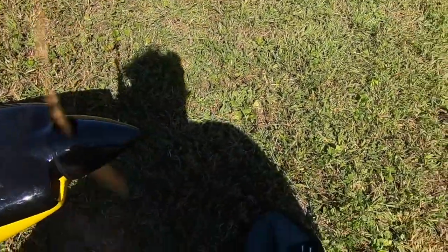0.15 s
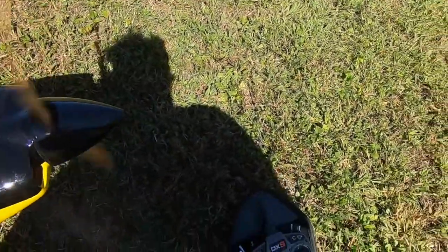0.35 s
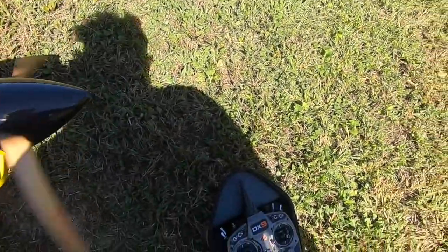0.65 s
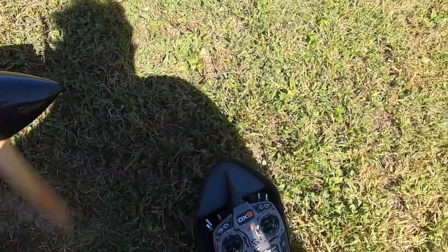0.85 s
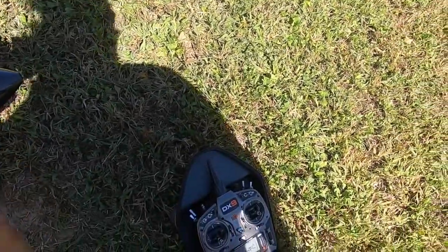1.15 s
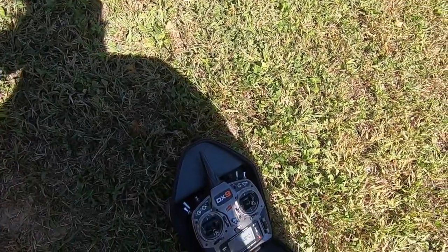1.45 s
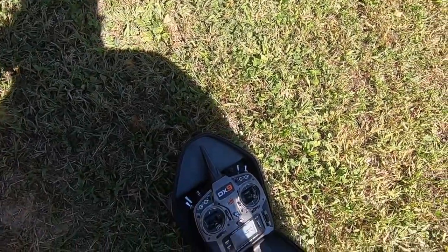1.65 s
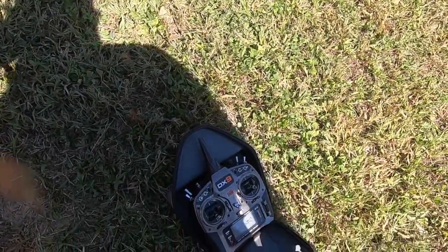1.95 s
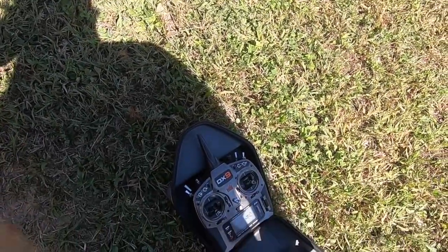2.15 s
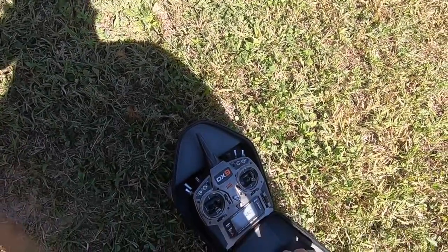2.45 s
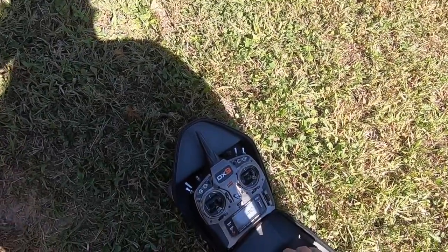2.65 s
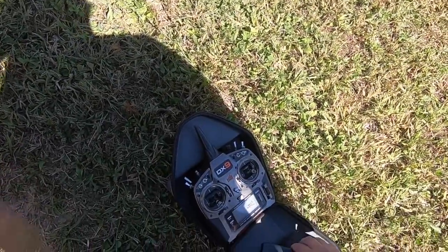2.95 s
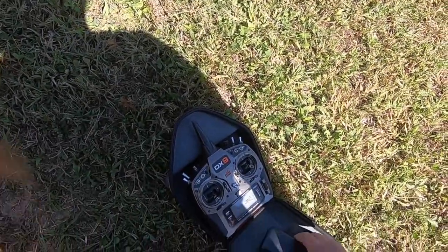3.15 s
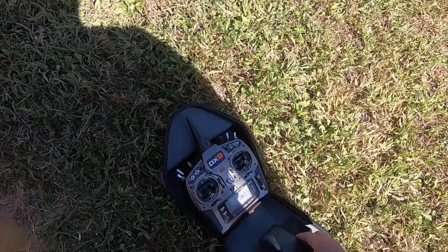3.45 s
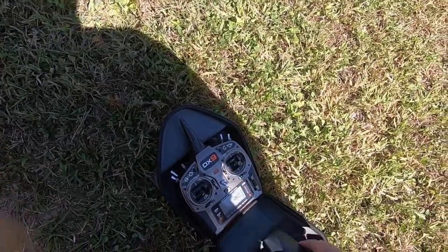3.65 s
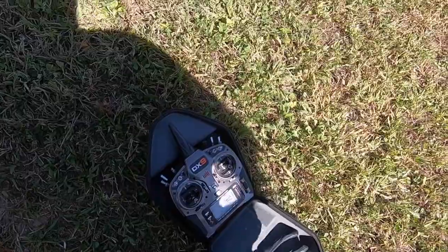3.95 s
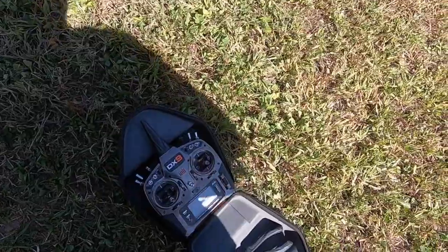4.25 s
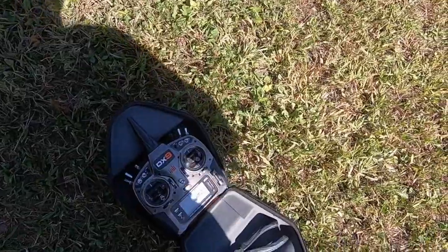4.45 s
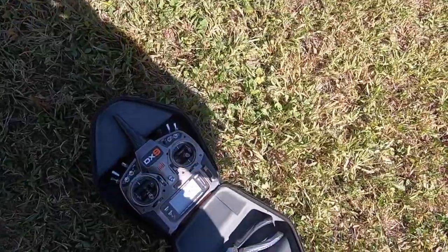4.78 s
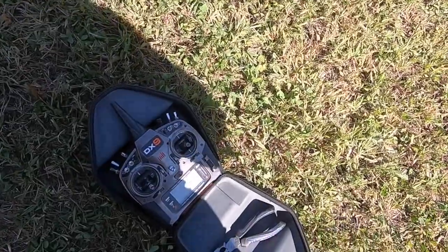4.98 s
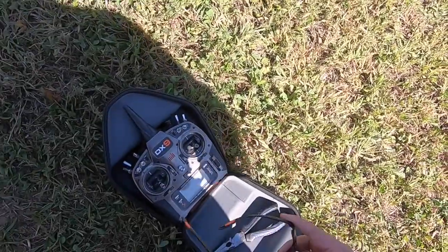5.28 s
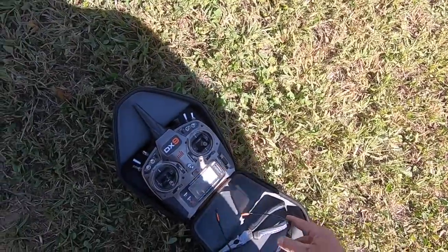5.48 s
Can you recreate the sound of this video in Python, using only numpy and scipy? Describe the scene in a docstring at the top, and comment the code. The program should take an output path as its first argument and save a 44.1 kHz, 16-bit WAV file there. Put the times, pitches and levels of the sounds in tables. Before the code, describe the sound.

A single-cylinder two-stroke on a large model plane idles throughout, close and loud, in the open over grass. The shaft turns about fifty times a second, each turn giving a soft low muffler puff and a tiny intake hiss, blending into a buzzing flutter. Mostly on every third turn it fires: a hard thump, hollow bark, metallic ring and gritty crack. The rhythm is lumpy, with short gaps near 0.3 s and 0.9 to 1.2 s, quicker pairs around 3.2 s, and slower, sparser, harder pops around 4.2 to 4.5 s before even firing resumes from 5 s. Propeller hum swells briefly around 2.2 and 2.5 s, and airy wash runs underneath. Until 3 s the image is almost mono, from the front, with cowl air fading. From 3.0 to 3.6 s it opens to stereo; as the microphone comes round to the side, pings sharpen, hum weakens after 4 s, and faint wind buffeting appears.

```python
"""On grass, a model plane's single-cylinder two-stroke idles at about 51 turns a second, firing in spells,
mostly on every third turn. Every turn puffs through the muffler's damped modes and sucks a hiss through the intake.
A firing adds a modal thump, bark, fins and ping and a burst of noise, the crack, and kicks the shaft on.
The two-blade propeller hums and churns; shaped noise makes its wash, the muffler's roar and the air round the cowl.
The microphone moves from the plane's front to its side, changing levels, colour, echoes and stereo image."""
import sys
import numpy as np
from scipy.fft import rfft, irfft, next_fast_len
from scipy.io import wavfile
from scipy.ndimage import map_coordinates

SR = 44100
rng = np.random.default_rng(int(sys.argv[2]) if len(sys.argv) > 2 else 0)


def store_wav(level_fs):
    """Save 16-bit WAV to argv[1]."""
    pcm = np.round(np.clip(np.atleast_2d(level_fs), -1, 1) * 32767)
    wavfile.write(sys.argv[1], SR, pcm.T.astype(np.int16))


N = 247842
TURN_HZ = 51.5  # nominal shaft speed
# "position" throughout: microphone 0 in front of the plane, 1 aside


def amp(db):
    """Decibels to gain."""
    return 10 ** (np.asarray(db) / 20)


def unit(x):
    """Scale to rms 1."""
    return x / np.sqrt(np.mean(x ** 2) + 1e-20)


def along(points, hz):
    """Interpolate (frequency [Hz], value) points on a log-frequency axis."""
    f, v = np.transpose(points)
    return np.interp(np.log(hz + 1), np.log(f + 1), v)


def curves(rows):
    """One value per sample for each column after the time."""
    time_s, *cols = np.transpose(rows)
    return [np.interp(np.arange(N) / SR, time_s, c) for c in cols]


def filtered(x, response):
    """Multiply the spectrum of x by a response of frequency."""
    size = next_fast_len(N + SR // 4)
    hz = np.fft.rfftfreq(size, 1 / SR)
    return irfft(rfft(x, size) * response(hz), size)[..., :N]


def noise(spectrum):
    """Stereo noise of rms 1, nearly mono in the bass and wide in the treble."""
    # left-right likeness: (frequency [Hz], correlation [-1 to 1])
    alike = [(100, 0.99), (300, .998), (600, 0.89), (1200, 0.54), (2500, 0.49), (4500, 0.55), (8000, 0.16),
             (13000, 0.2)]

    def mid_side(hz):
        turn_rad = np.arccos(np.clip(along(alike, hz), -1, 1)) / 2
        return amp(along(spectrum, hz)) * [np.cos(turn_rad), np.sin(turn_rad)]

    mid, side = filtered(rng.standard_normal((2, N)), mid_side)
    return unit(np.array([mid + side, mid - side]))


def viewed(front, aside, position):
    """Noise whose colour changes as the microphone moves round the plane."""
    share = np.clip(position, 0, 1)
    return np.sqrt(1 - share) * noise(front) + np.sqrt(share) * noise(aside)


def place(times_s, shapes):
    """Sum one row of samples starting at each time."""
    start = np.round(times_s * SR).astype(int)
    index = start[:, None] + np.arange(shapes.shape[1])
    inside = (index >= 0) & (index < N)
    return np.bincount(index[inside], shapes[inside], N)


def swell(attack_s, t60_s):
    """A quick rise and an exponential decay."""
    t = np.arange(SR // 12) / SR
    return (1 - np.exp(-t / attack_s)) * amp(-60 * t / t60_s)


def ring(hz, t60_s, attack_s, detune):
    """A damped mode, one row for each fractional detuning."""
    t = np.arange(SR // 12) / SR
    return np.sin(2 * np.pi * hz * (1 + detune) * t) * swell(attack_s, t60_s)


def shaft(fired_s, coast_s=.00008):
    """The time of every turn: fast just after a firing, slowing until the next."""
    turns_s = [fired_s[:1] - 1 / TURN_HZ]
    for start, end in zip(fired_s, fired_s[1:]):
        count = max(1, round((end - start) * TURN_HZ))
        k = np.arange(count)
        even = start + (end - start) * k / count
        turns_s.append(even - coast_s * k * (count - k))
    run_out = fired_s[-1] + np.arange(4) / TURN_HZ
    return np.concatenate(turns_s + [run_out])


def firings():
    """The engine skips turns while fresh charge gathers; the longer the wait, the harder it fires."""
    # spells of even firing: (first firing [s], last firing [s], interval [turns], strength before wait gain [dB])
    spells = [(0.0114, 0.2554, 3, -0.5), (0.337, 0.8675, 3, 0.3), (.8883, 0.9475, 3, 1),
              (1.0255, 1.0834, 3, 0), (1.1236, 1.2012, 2, -3), (1.241, 1.3553, 3, -1),
              (1.375, 1.4536, 2, -1), (1.4739, 1.7618, 3, -1), (1.8012, 1.92, 3, 0), (1.9406, 2.1741, 3, 0),
              (2.2507, 2.3074, 3, -0.5), (2.3868, 2.4458, 3, 0.5), (2.485, 2.5422, 3, -1),
              (2.5792, 2.6368, 3, -0.5), (2.6949, 2.875, 3, -1.5), (2.9149, 3.1443, 3, -1),
              (3.1802, 3.2562, 2, -1.5), (3.2744, 3.3516, 2, -2), (3.4068, 3.4647, 3, -2),
              (3.4834, 4.0001, 3, 0), (4.0795, 4.137, 3, 1), (4.2147, 4.292, 4, 0.5),
              (4.3492, 4.4477, 5, 1), (4.5059, 4.5643, 3, 0), (4.6028, 4.6415, 2, 0.5),
              (4.701, 4.9339, 3, 0.5), (5.0125, 5.5996, 3, 0)]
    # times near turns on which part of the charge burns weakly and early [s]
    early_near_s = [1.182, 1.5122, 2.5986, 2.9342, 3.3318, 3.7519, 3.9804, 4.5447, 5.1687, 5.4042]
    usual_wait_turns, gain_db_per_doubled_wait, early_strength_db = 3, 2.5, -6.5
    fired_s, spell_db = [], []
    for first, last, every, db in spells:
        count = round((last - first) * TURN_HZ / round(every)) + 1
        fired_s.append(np.linspace(first, last, count))
        spell_db.append(np.full(count, db))
    fired_s = np.concatenate(fired_s)
    before_s = fired_s[0] - usual_wait_turns / TURN_HZ
    wait_turns = np.diff(fired_s, prepend=before_s) * TURN_HZ
    wait_gain_db = gain_db_per_doubled_wait * np.log2(wait_turns / usual_wait_turns)
    strength_db = np.concatenate(spell_db) + wait_gain_db
    turns_s = shaft(fired_s)
    nearest = np.abs(turns_s[:, None] - early_near_s).argmin(axis=0)
    early_s = turns_s[nearest]
    early_db = np.full(len(early_s), early_strength_db)
    return turns_s, np.append(fired_s, early_s), np.append(strength_db, early_db)


def excited(law, strength_db, position, scatter_db):
    """The level of one part's answer to each firing, from the microphone's position and the firing's strength."""
    *view_db, slope = law
    scatter = scatter_db * rng.standard_normal(len(position))
    return np.interp(position, [0, .5, 1], view_db) + slope * strength_db + scatter


def muffler(times_s, db, modes, attack_s, scatter_db, drift):
    """Gas pulses ring the muffler; a hotter pulse is a little louder and higher."""
    heat = rng.standard_normal((len(times_s), 1))
    rings = sum(strength * ring(hz, t60_s, attack_s, drift * heat) for hz, strength, t60_s in modes)
    return place(times_s, amp(db[:, None] + scatter_db * heat) * rings)


def puffs(turns_s, puff_db):
    """An unburnt charge sweeps the muffler and intake on every turn."""
    # (mode [Hz], signed relative strength, t60 [s])
    puff_modes = [(133.3, -0.15, 0.11), (243.3, 0.96, 0.026), (316.6, -1.128, 0.03116),
                  (327.55, 0.753, 0.058), (457.5, 0.019, 0.079), (663, 0.0285, 0.03)]
    db = np.interp(turns_s, np.arange(N) / SR, puff_db)
    return muffler(turns_s + 0.002128, db, puff_modes, attack_s=0.00093, scatter_db=1.0, drift=0.0082)


def thumps(fired_s, strength_db, position):
    """Burnt gas strikes the muffler at each firing."""
    # (mode [Hz], signed relative strength, t60 [s])
    thump_modes = [(111, -0.37, 0.033), (237.8, 0.95, 0.032), (294.2, -0.35, 0.066), (361.6, -0.5, 0.037),
                   (554, 0.023, 0.039), (755, -0.098, 0.016)]
    # (in front [dB], halfway round [dB], aside [dB], slope [dB per dB of strength])
    thump_law = (1.94, 1.14, 0.22, 0.18)
    db = excited(thump_law, strength_db, position, scatter_db=0.28)
    return muffler(fired_s + 0.00027, db, thump_modes, attack_s=0.0006, scatter_db=0.62, drift=0.0063)


def metal(times_s, db, position, modes, attack_s, scatter_db, drift, spread_db):
    """Each firing rings metal modes at new strengths, a little differently to each side."""
    out = np.zeros((2, N))
    for k, (hz, front_db, aside_db, t60_s) in enumerate(modes):
        chance = rng.standard_normal((len(times_s), 3))
        view_db = front_db + position * (aside_db - front_db)
        level_db = db + view_db + scatter_db * chance[:, 0]
        sign = (-1) ** (k + 1)  # neighbouring modes swing oppositely
        rings = sign * ring(hz, t60_s, attack_s, drift * chance[:, 1:2])
        for channel, side in enumerate((1, -1)):
            gain = amp(level_db + side * spread_db * chance[:, 2])
            out[channel] += place(times_s, gain[:, None] * rings)
    return out


def bark(fired_s, strength_db, position):
    """The muffler's shell rings at each firing."""
    # (mode [Hz], relative level in front [dB], relative level aside [dB], t60 [s])
    shell_modes = [(650, -23, -54, 0.052), (994, -24, -31, 0.011), (1420, -11.5, -22, 0.014),
                   (1635, -17, -15, 0.02), (1860, -55, -20.5, 0.024)]
    # (in front [dB], halfway round [dB], aside [dB], slope [dB per dB of strength])
    bark_law = (-1.5, -4.5, -1, 0.84)
    db = excited(bark_law, strength_db, position, scatter_db=0.7)
    return metal(fired_s - .0004, db, position, shell_modes,
                 attack_s=0.00073, scatter_db=1.05, drift=0.023, spread_db=-2.0)


def fins(fired_s, strength_db, position):
    """The cylinder fins ring at each firing."""
    # (mode [Hz], relative level in front [dB], relative level aside [dB], t60 [s])
    fin_modes = [(2510, -35.5, -33, 0.018), (2956, -31, -29.5, 0.021), (4065, -24, -27, 0.017),
                 (4410, -26.5, -22.5, 0.011), (5060, -27, -27, 0.01), (7680, -28.5, -69, 0.012)]
    # (in front [dB], halfway round [dB], aside [dB], slope [dB per dB of strength])
    fin_law = (-1.7, 2, 0, 0.7)
    db = excited(fin_law, strength_db, position, scatter_db=2.45)
    return metal(fired_s + 0.000875, db, position, fin_modes,
                 attack_s=0.00053, scatter_db=0.0, drift=0.029, spread_db=0.5)


def ping(fired_s, strength_db, position):
    """One metal part pings at each firing."""
    # (mode [Hz], relative level in front [dB], relative level aside [dB], t60 [s])
    ping_modes = [(3310, -19, -21, 0.033)]
    # (in front [dB], halfway round [dB], aside [dB], slope [dB per dB of strength])
    ping_law = (-18.5, -21, -2.5, 2)
    db = excited(ping_law, strength_db, position, scatter_db=2.2)
    return metal(fired_s + 0.00099, db, position, ping_modes,
                 attack_s=0.00045, scatter_db=3.4, drift=0.009, spread_db=3.0)


def crack(fired_s, strength_db, fired_position, position):
    """Gas leaks as the port cracks open, bursts out, then hisses on."""
    # noise colours: (frequency [Hz], relative density [dB per Hz])
    crack_front = [(500, 3), (1400, 4), (2100, -2.5), (2700, -0.5), (3500, -10), (4400, -15.5),
                   (5800, -7.5), (7600, -8.5), (8500, -18.5), (10500, -24.5), (11300, -34), (13500, -35),
                   (15800, -40)]
    crack_aside = [(500, 6), (1800, 1), (2400, -3.5), (3000, -0.5), (3700, -19), (4500, -14.5),
                   (6200, -8.5), (8000, -11), (10300, -13.5), (11400, -28.5), (13500, -28), (15800, -34)]
    # (in front [dB], halfway round [dB], aside [dB], slope [dB per dB of strength])
    crack_law = (1.6, 1.1, 2.4, 1.22)
    size = amp(excited(crack_law, strength_db, fired_position, scatter_db=0.87))[:, None]
    leak = amp(-35) * swell(attack_s=0.0015, t60_s=0.048)
    burst = amp(-16.5) * swell(attack_s=0.0004, t60_s=0.005)
    hiss = amp(-26.5) * swell(attack_s=0.0022, t60_s=0.06)
    flow = place(fired_s - .004, size * leak) + place(fired_s + 0.00081, size * (burst + hiss))
    return flow * viewed(crack_front, crack_aside, position)


def propeller(angle_turns, hum_db, churn_db, blade_lead_turns=0.22):
    """Two blades press the air twice a turn and leave a low churning behind."""
    # (frequency [Hz], relative density [dB per Hz])
    churn_spectrum = [(20, -2), (50, 2), (80, -5), (200, 6), (350, -9.5), (530, -5), (600, -9.5),
                      (690, -11), (800, -16), (1300, -55)]
    blades = amp(hum_db + 1.66) * np.cos(4 * np.pi * (angle_turns + blade_lead_turns))
    once_a_turn = amp(-28.5) * np.sin(2 * np.pi * angle_turns)
    return blades + once_a_turn + amp(churn_db - 27.0) * noise(churn_spectrum)


def roar(angle_turns, hum_db, load=1.0, pulse_db=3):
    """Gas swirls through the muffler on every turn, the more so when the propeller pulls hard."""
    # (frequency [Hz], relative density [dB per Hz])
    roar_spectrum = [(300, -24), (450, -7.5), (530, -1), (590, -1.5), (680, 2), (780, -16), (900, -30),
                     (1050, -6.5), (1500, -10.5), (2500, -32), (4000, -43.5)]
    pulse = pulse_db * np.cos(2 * np.pi * (angle_turns - .2))
    return amp(-34.5 + load * (hum_db + 20.5) + pulse) * noise(roar_spectrum)


def intake(turns_s, opens_s=0.0071):
    """The carburettor sucks in a short hiss of varying level about 5 ms after each muffler puff starts."""
    # (frequency [Hz], relative density [dB per Hz])
    intake_spectrum = [(2000, -12), (4500, -2), (7500, 0), (9000, 8), (10500, 3), (11300, -16),
                       (13500, -25), (15800, -35)]
    scatter_db = 3.5 * rng.standard_normal((len(turns_s), 1))
    gulps = amp(-35.0 + scatter_db) * swell(attack_s=0.0014, t60_s=0.012)
    return place(turns_s + opens_s, gulps) * noise(intake_spectrum)


def wash(angle_turns, wash_db, position, chop_db=0.7, throb_db=2.5, gust_db=1.1):
    """Turbulent air hisses off the blades, chopped by each pass and gusting at random."""
    # noise colours: (frequency [Hz], relative density [dB per Hz])
    wash_front = [(400, -11), (680, 3.5), (900, -2.5), (1500, 0.5), (2200, -7), (3500, -11), (4500, -12),
                  (6200, -14.5), (7600, -14.5), (8400, -24), (10500, -29), (11200, -38.5), (13500, -47),
                  (15800, -56)]
    wash_aside = [(400, 2.5), (750, 1), (1100, 0), (1900, 0.5), (2600, -5.5), (4200, -11.5), (5200, -15),
                  (7200, -19.5), (8900, -12), (10400, -29.5), (11300, -30), (13500, -44), (15800, -60)]
    chop = chop_db * np.cos(4 * np.pi * (angle_turns + 0.16))
    throb = throb_db * np.cos(2 * np.pi * (angle_turns + 0.24))
    gusts = gust_db * map_coordinates(rng.standard_normal(400), [angle_turns / 4])
    return amp(wash_db - 31.5 + chop + throb + gusts) * viewed(wash_front, wash_aside, position)


def cowl(angle_turns, start_db=-33.5, fade_db_per_s=11, throb_db=3):
    """Air rushing round the cowl throbs once a turn and fades steadily as the microphone draws back."""
    # (frequency [Hz], relative density [dB per Hz])
    cowl_spectrum = [(400, -27), (700, -8), (930, 4), (1200, -7), (1900, -9.5), (2600, -33), (5000, -50)]
    t = np.arange(N) / SR
    throb = throb_db * np.cos(2 * np.pi * (angle_turns - .15))
    return amp(start_db - fade_db_per_s * t + throb) * noise(cowl_spectrum)


def surroundings(x, position, sway_s=0.0002):
    """Ground, wing and pilot return short echoes whose delays wander and slide as the microphone moves."""
    # (delay in front [s], delay aside [s], level [dB])
    bounces = [(.0021, 0.0024, -19), (.0046, 0.0061, -18), (.0078, .0095, -15.5)]
    t = np.arange(N) / SR
    out = x
    for front_s, aside_s, db in bounces:
        wander = map_coordinates(rng.standard_normal(20), [2 * t])
        delay_s = front_s + position * (aside_s - front_s) + sway_s * wander
        echo = np.array([map_coordinates(channel, [(t - delay_s) * SR]) for channel in x])
        out = out + amp(db) * echo
    return out


def ports(x, position, shade_power=2.8):
    """With the engine aside, the sound is earlier and tilted in level at the left port; draught buffets both."""
    # level tilt with the engine aside: (frequency [Hz], left minus right [dB])
    left_tilt = [(300, 0.5), (540, 1.5), (1130, 12), (2360, 7.5), (4930, 3.3), (10300, -1), (13000, -2)]
    # draught on the microphone ports: (frequency [Hz], relative density [dB per Hz])
    buffet_spectrum = [(20, 6), (60, -2), (120, -3), (300, -14), (600, -35), (1500, -75)]
    lead_front_s, lead_aside_s, buffet_db_aside = .000002, .000045, -58.5
    half_lead = (lead_front_s + position * (lead_aside_s - lead_front_s)) * SR / 2  # samples
    heard = np.array([map_coordinates(channel, [np.arange(N) + side * half_lead], order=5)
                      for channel, side in zip(x, (1, -1))])

    def tilt(hz):
        return 1 + np.outer([1, -1], np.tanh(np.log(amp(along(left_tilt, hz))) / 2))

    draught = filtered(rng.standard_normal((2, N)), lambda hz: amp(along(buffet_spectrum, hz)))
    buffet = amp(buffet_db_aside) * unit(draught)
    turned = np.clip(position, 0, 1) ** shade_power
    return (1 - turned) * heard + turned * (filtered(heard, tilt) + buffet)


def scene():
    """Exhaust pulses, ringing metal, the hiss of gas and the propeller, all tied to the shaft."""
    # (time [s], relative puff level [dB], relative churn level [dB], relative wash level [dB], position [0-1])
    run = [(0, 1, 5, -3.5, 0), (.6, 2.5, -3.5, -2.5, 0), (1.5, 2, 0, -2.5, 0.094),
           (2.6, 1.5, -0.5, -2.5, 0), (3.3, 1, 2, -3, 0.103), (3.9, .5, 2, -3, 0.687),
           (4.5, 1.5, 3.5, 1, 0.866), (5.1, 0, -5.5, 0.5, 0.99), (5.62, 0.5, -1, 1, .84)]
    # propeller hum: (time [s], relative level [dB])
    hum_levels = [(0.05, -24), (0.08, -21.5), (1.69, -19), (2.06, -21.5), (2.24, -17), (2.38, -24),
                  (2.52, -14), (2.76, -22.5), (3.31, -17.5), (4.46, -26), (4.55, -27.5), (4.72, -26.5),
                  (5.5, -27.5), (5.55, -26)]
    puff_db, churn_db, wash_db, position = curves(run)
    hum_db, = curves(hum_levels)
    t = np.arange(N) / SR
    turns_s, fired_s, strength_db = firings()
    angle_turns = np.interp(t, turns_s, np.arange(len(turns_s)))
    fired_position = np.interp(fired_s, t, position)
    firing = (fired_s, strength_db, fired_position)
    low = puffs(turns_s, puff_db) + thumps(*firing)
    low = low + roar(angle_turns, hum_db) + propeller(angle_turns, hum_db, churn_db)
    bright = bark(*firing) + fins(*firing) + crack(*firing, position)
    bright = bright + intake(turns_s) + wash(angle_turns, wash_db, position) + cowl(angle_turns)
    return ports(low + ping(*firing) + surroundings(bright, position), position)


def record(dry, low_cut_hz=42, top_hz=15800, push_ceiling=0.72, pull_ceiling=1.0, hardness=6):
    """The camera opens from mono to stereo, cuts deep bass, rounds positive peaks sooner and cuts the top."""
    # (time [s], stereo width [0-1])
    image_width = [(3.02, .01), (3.3, 0.15), (3.6, 1)]
    width, = curves(image_width)
    mid = dry.mean(axis=0)
    image = mid + width * (dry - mid)
    x = filtered(image, lambda hz: hz ** 4 / (hz ** 4 + low_cut_hz ** 4))
    ceiling = np.where(x > 0, push_ceiling, pull_ceiling)
    x = x / (1 + np.abs(x / ceiling) ** hardness) ** (1 / hardness)
    return filtered(x, lambda hz: hz < top_hz)


dry = scene()
out = record(dry)
store_wav(out)
```